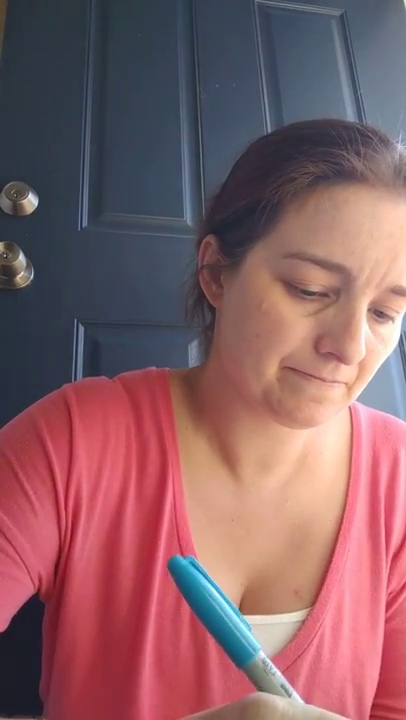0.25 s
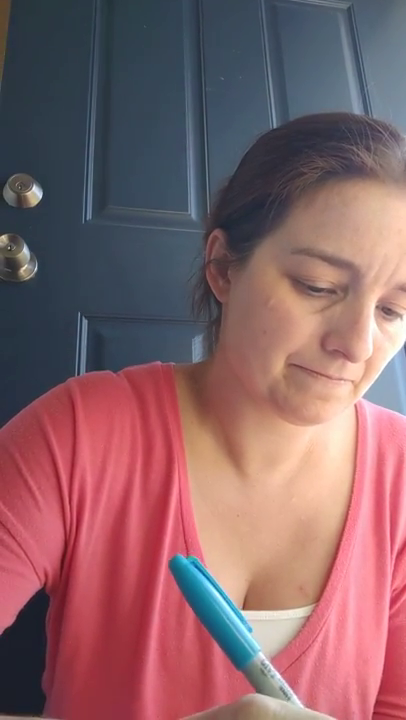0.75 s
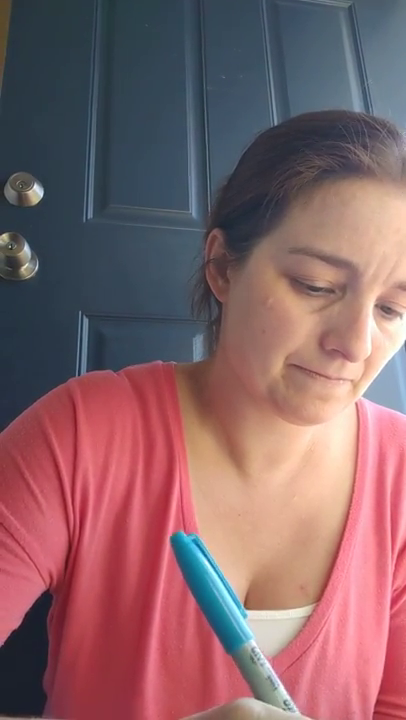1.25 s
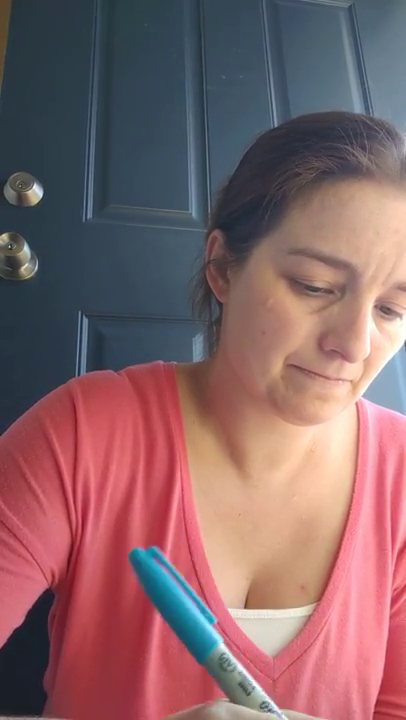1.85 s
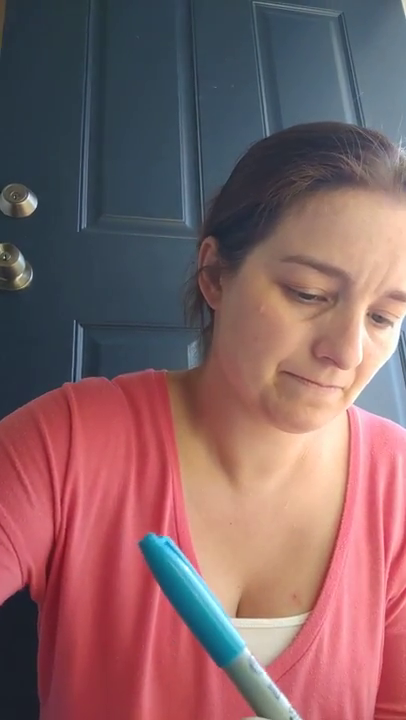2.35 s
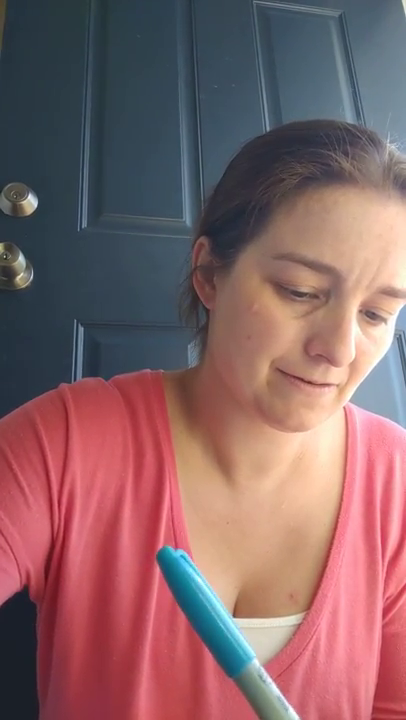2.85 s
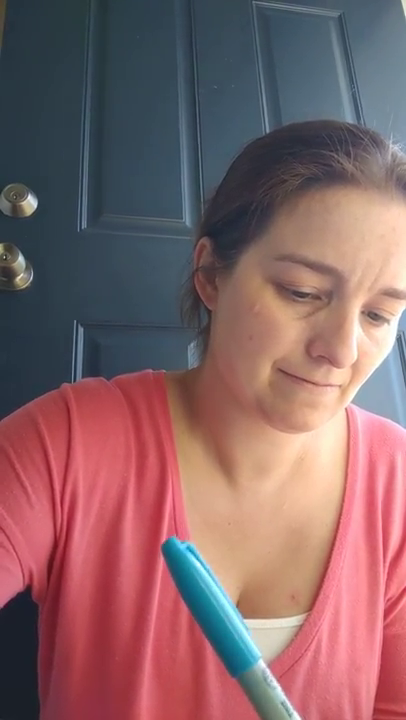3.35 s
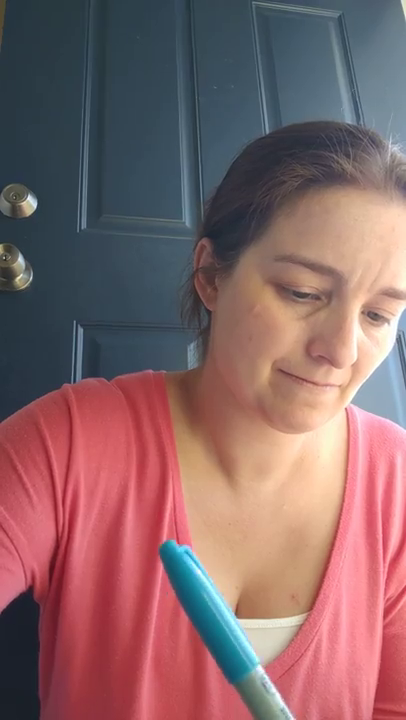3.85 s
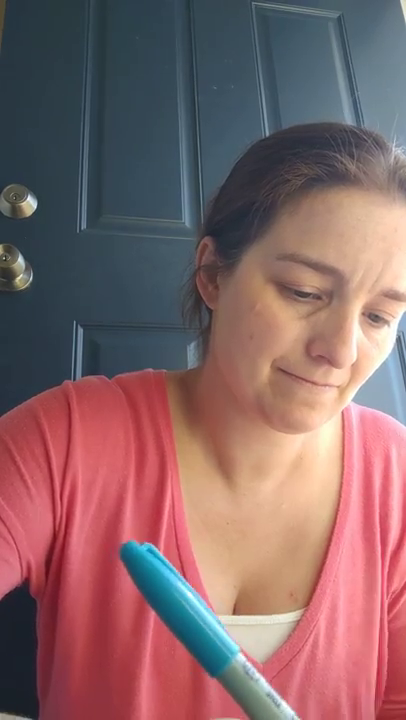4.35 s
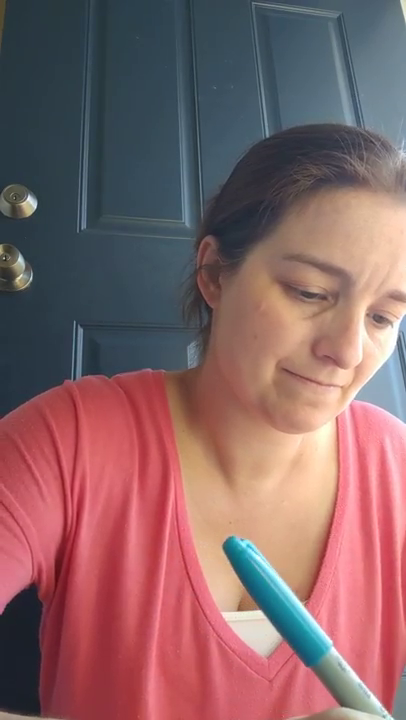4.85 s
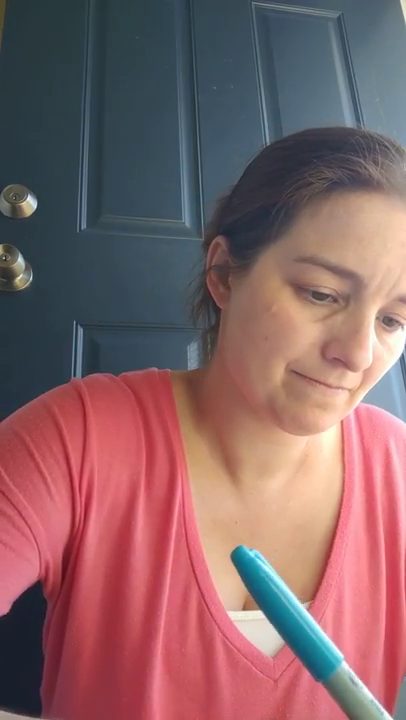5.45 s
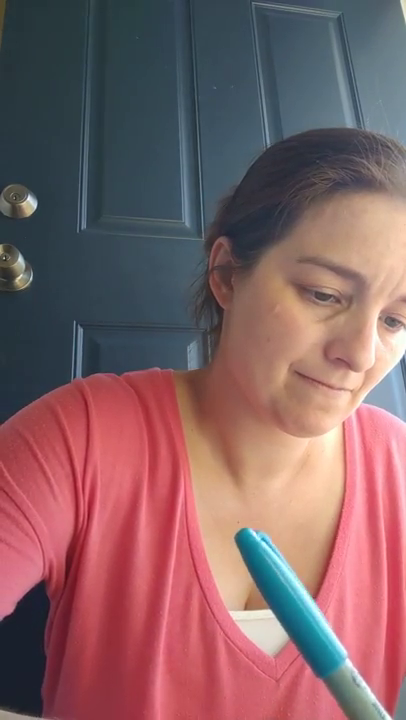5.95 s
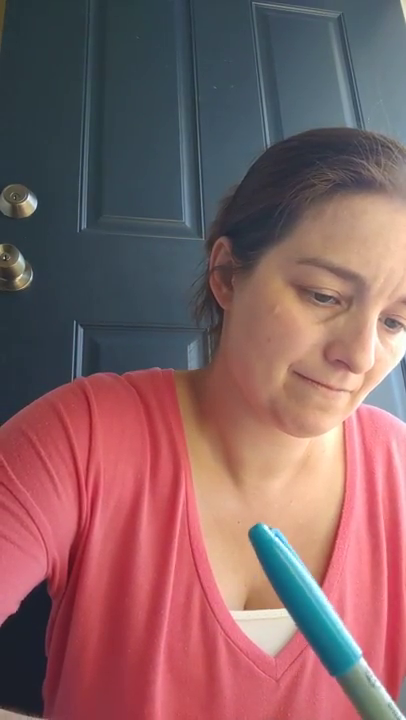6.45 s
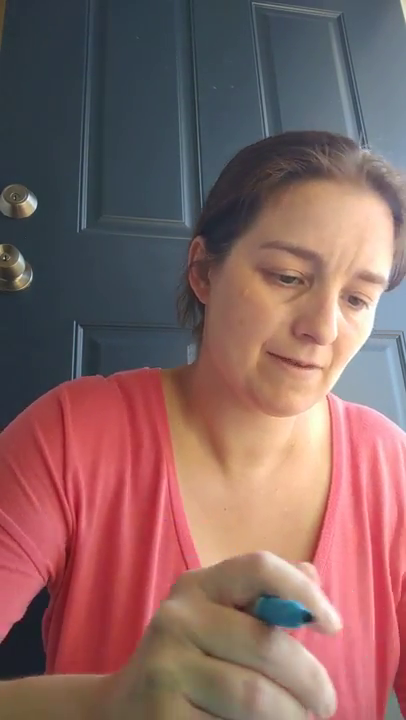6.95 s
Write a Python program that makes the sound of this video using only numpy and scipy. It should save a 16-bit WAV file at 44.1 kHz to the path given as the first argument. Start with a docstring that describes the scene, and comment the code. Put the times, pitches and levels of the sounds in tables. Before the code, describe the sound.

A felt-tip marker writes on paper lying on a table, close to the microphone in a quiet room. Short, faint rasping strokes come several per second, with thin squeaks and tiny clicks. Just after two seconds a hard knock rings the table, followed by smaller taps; writing resumes until about six and a half seconds, then fades into light clicks.

```python
"""At a table in a quiet room, a felt-tip marker writes on a sheet of paper close to the microphone.
Tiny random slips of the nib's fibres drive three filters: the sheet rasps, the fibres fizz, the nib sings.
Each stroke swells and fades with the pen's speed, over light clicks, soft bumps and a faint brush of skin.
Sharp blows ring the table top; the heel of the hand thumps it twice, and its low modes ring out as sines.
Underneath lie the dull rumble of the hand, faint air noise and a low, slowly sinking hum."""
import sys
import numpy as np
from scipy import signal
from scipy.fft import rfft, irfft
from scipy.io import wavfile
from scipy.ndimage import uniform_filter1d

SR = 44100
rng = np.random.default_rng(int(sys.argv[2]) if len(sys.argv) > 2 else 0)


def file_out(sig):
    """Save sig as 16-bit WAV at sys.argv[1]."""
    # one column per channel
    cols = np.atleast_2d(sig).T
    # limit, then scale
    lim = np.clip(cols, -1, 1)
    pcm = np.round(lim * 32767).astype(np.int16)
    wavfile.write(sys.argv[1], SR, pcm)


N = 317167  # length in samples

# All levels are settings ahead of the mix trims; spectra are relative, since each layer is scaled afterwards.
# pen strokes: start_s, length_s, fastest moment (share of length), rasp_db, fizz_db, song_db, nib pitch_hz
STROKES = [(0.33, 0.076, 0.25, -54, -61.5, -56.5, 3400), (0.428, 0.14, 0.048, -56.5, -60.0, -54.5, 3200),
           (0.684, 0.29, 0.24, -56.5, -64.5, -63, 3360), (0.824, 0.18, 0.34, -58.5, -62, -58, 3220),
           (1.036, 0.15, 0.8, -51.5, -61, -55, 3300), (1.179, 0.11, 0.18, -59, -60.5, -54.5, 3460),
           (1.299, 0.069, 0.47, -52, -60, -54.5, 3600), (1.364, 0.12, 0.63, -73.0, -76, -67.5, 3620),
           (1.528, 0.12, 0.58, -48.5, -58, -52, 3430), (1.677, 0.084, 0.058, -54.5, -56, -54, 3600),
           (1.731, 0.14, 1, -47.0, -56, -63, 3650), (1.994, 0.28, 0.24, -67.5, -62, -54, 3650),
           (2.26, 0.12, 0.31, -61.5, -66.5, -61, 3430), (2.727, 0.07, 0.28, -54, -58.5, -60.5, 3660),
           (2.817, 0.15, 0.41, -56.5, -57.5, -59, 3930), (3.078, 0.14, 0.27, -61.5, -58, -55.5, 3970),
           (3.196, 0.14, 0.2, -59.5, -60.5, -58.5, 4020), (3.338, 0.074, 0.31, -63, -68, -51, 3920),
           (3.401, 0.11, 0.61, -54, -59.5, -57.5, 3570), (3.499, 0.11, 0.3, -63.5, -62, -55.0, 4100),
           (3.631, 0.091, 0.079, -58.5, -64, -55.5, 3550), (3.731, 0.059, 0.94, -78, -73, -59.5, 4130),
           (3.889, 0.1, 0.44, -55.0, -61, -54, 3450), (4.012, 0.12, 0.072, -56.5, -55.5, -53, 3950),
           (4.09, 0.132, 0.93, -51, -56.0, -50.5, 3470), (4.313, 0.25, 0.21, -65.5, -67.0, -64.0, 3300),
           (4.469, 0.17, 0.36, -59.5, -63, -60, 3270), (4.608, 0.15, 0.25, -59, -62.5, -58, 3470),
           (4.717, 0.16, 0.61, -59.5, -61.5, -55.5, 3230), (4.924, 0.14, 0.8, -79, -79.5, -70.5, 3700),
           (5.164, 0.069, 0.75, -55.5, -62, -58, 3600), (5.261, 0.12, 0.039, -52, -58, -54.5, 3470),
           (5.481, 0.16, 0.5, -55.5, -61.5, -61.5, 3700), (5.614, 0.097, 0.09, -56, -60, -59.5, 3850),
           (5.727, 0.054, 0.85, -62.5, -59, -55.5, 4000), (5.771, 0.16, 0.42, -52, -59, -59, 3730),
           (5.879, 0.12, 0.39, -55.5, -58.5, -56.5, 3800), (6.012, 0.098, 0.091, -56.5, -62, -58.5, 3840),
           (6.086, 0.11, 0.64, -70, -67, -61.5, 3870), (6.201, 0.035, 0.28, -61.5, -64, -54.5, 3950),
           (6.271, 0.104, 0.36, -54.0, -58, -54.5, 3770), (6.402, 0.17, 0.074, -54.5, -56.5, -56, 3660),
           (6.505, 0.13, 0.79, -49, -54, -53, 3700), (6.908, 0.21, 0.7, -67, -69.5, -64.5, 3380),
           (7.11, 0.15, 0.073, -65, -74, -61, 3400)]
# the nib catches and sings out: start_s, length_s, level_db
SQUEAKS = [(0.45, 0.058, -52), (0.79, 0.052, -52.5), (1.04, 0.03, -54.5), (1.229, 0.041, -46.5),
           (1.78, 0.12, -49.5), (2.948, 0.03, -58.5), (3.149, 0.041, -51), (3.36, 0.045, -52),
           (3.559, 0.044, -47.5), (3.69, 0.025, -56.5)]
SQUEAK_PEAK = 0.26  # fastest moment of a squeak, as a share of its length
RASP_LAW, FIZZ_LAW, NIB_LAW = 0.6, 0.98, 0.76  # each layer's amplitude grows as pen speed to this power
RELEASE_S = 0.0077  # smoothing time of the power: the scratch lingers after the pen slows
# colour of the slips in the sheet: pitch_hz, gain_db
RASP_SPECTRUM = [(60, -6), (170, 0.5), (260, 5.5), (500, 1.5), (660, -3.5), (900, -3.5), (1200, -6.5),
                 (2000, -3), (2700, -6.5), (3500, -21.5), (4300, -25), (7000, -48)]
# colour of the slips in the fibres: pitch_hz, gain_db
FIZZ_SPECTRUM = [(2000, -44), (4200, -12), (5500, 0.5), (6200, -2), (7100, 5.5), (8300, -3), (9300, -0.5),
                 (10500, -1), (11500, -0.5), (13000, 1), (15500, -3.5), (16500, -13)]
# colour of the slips in the nib: pitch_hz, gain_db
NIB_SPECTRUM = [(1000, -56), (2200, -7), (3000, -6.5), (3500, 2), (4000, 1), (4400, 1.5), (4900, -3),
                (5600, -8.5), (8000, -8.5), (14000, -28)]
# resonances and dips of the sheet lying on the table: pitch_hz, width_hz, lift_db
SHEET_MODES = [(554, 89, 8.5), (699, 75, -7), (804.5, 132, 14), (1009, 20, 14.5), (1195, 33, -5.5),
               (1415, 210, 5), (1640, 96, 4.5), (1720, 45, -9.5), (2395, 410, 4), (2990, 100, 10.5),
               (3200, 75, 9), (3400, 180, 18.5)]
# the side of the hand brushes faintly over the paper: start_s, length_s, rasp_db, fizz_db
BRUSHES = [(0, 0.35, -68.5, -99), (1.877, 0.34, -68, -76.5), (2.336, 0.44, -82, -81.5),
           (6.615, 0.12, -67.5, -94)]
BRUSH_PEAK, BRUSH_LAW = 0.067, 0.28  # fastest moment (share of length); power of speed
# light clicks of the nib, the barrel and the paper: start_s, peak_db, pitch_hz, t60_s
TICKS = [(0.013, -36.5, 990, 0.056), (.269, -43.5, 2800, 0.089), (.269, -56, 9500, 0.044),
         (.344, -38.5, 2730, 0.043), (.697, -38.5, 1070, 0.034), (.793, -41, 9100, 0.0095),
         (1.309, -40, 1800, 0.054), (1.512, -48, 2520, 0.0083), (1.518, -45, 600, 0.054),
         (1.682, -38.5, 1480, 0.085), (2.168, -29, 2200, 0.027), (2.212, -43, 8800, 0.016),
         (2.667, -42, 3420, 0.032), (3.344, -43, 3650, .04), (3.849, -46.5, 3840, .03),
         (4.022, -42, 4500, 0.047), (6.284, -41, 3640, .04), (6.41, -38, 2390, 0.057),
         (6.864, -46.5, 2540, 0.023), (7.002, -47.5, 1840, 0.058), (7.044, -39, 11400, 0.019),
         (7.082, -42.5, 3260, 0.11), (7.128, -36.5, 2930, 0.047)]
TICK_RISE_S = 0.0004  # a click swells this quickly
# sharp blows on the table: start_s, peak_db, treble_db (7 dB is added to it for the treble tilt)
KNOCKS = [(.0135, -43.5, -23), (0.495, -45, -53), (.696, -38.5, -14), (1.1158, -29.5, -49),
          (2.1526, -10, -4), (2.17, -28, 0), (2.227, -32, -41), (2.326, -21.5, -10), (2.401, -37.5, -34),
          (3.238, -37, -24), (4.329, -25, -11.5), (5.718, -38, -14.5), (6.426, -26.5, -7.5)]
# colour of a blow on the table top: pitch_hz, gain_db
KNOCK_SPECTRUM = [(25, -28), (65, -5), (130, -8), (220, -25.5), (290, -10), (680, -10), (840, -18.5),
                  (1070, -14.5), (1600, -10.5), (2300, -24.5), (2750, -18), (3600, -16.5), (5400, -36.5),
                  (12000, -59.5)]
# modes of the table top: pitch_hz, width_hz, lift_db
TABLE_MODES = [(66.3, 6.8, -0.5), (94, 24, -1.5), (197, 17, 9), (264.6, 61, 15.5), (363, 23, 6),
               (504, 70, 7.5), (736, 117, 14.5), (1061, 130, 10.5), (1440, 150, 0.5), (2400, 150, 5),
               (3000, 140, 3.5), (3315, 120, -14), (3460, 76, 9), (4690, 480, 5)]
# the heel of the hand thumps the table: start_s, peak_db
THUMPS = [(2.173, -30), (2.351, -42)]
# low modes of the table that a thump rings: pitch_hz, level_db, t60_s
THUMP_MODES = [(69.9, -5.5, 1), (97.3, 3, 0.31), (187.4, -0.5, .3), (248, -9, 0.25)]
THUMP_RISE_S = 0.0032  # a thump builds up over this time
# soft bumps of the hand and the nib pressing down: start_s, level_db, pitch_hz, length_s (swell peaks at 1/4)
BUMPS = [(0.103, -57, 227, 0.038), (.278, -46.5, 313, 0.052), (.496, -49.5, 300, 0.027),
         (0.69, -51.5, 210, 0.033), (0.892, -52, 365, .05), (1.074, -50.5, 84, 0.1),
         (1.12, -45, 380, 0.035), (1.305, -52.5, 160, 0.028), (1.516, -46.5, 352, 0.06),
         (1.543, -43, 220, 0.053), (1.683, -51, 70.6, 0.079), (1.916, -51.5, 308, 0.04),
         (2.175, -44, 281, 0.037), (2.243, -51, 200, 0.057), (2.682, -49.5, 283, 0.025),
         (2.832, -53, 288, 0.029), (3.096, -54.5, 280, 0.027), (3.244, -52.5, 282, .031),
         (3.856, -53, 187, 0.029), (6.614, -41.5, 600, 0.043)]
# rumble of the hand shifting on the table: time_s, level_db
HAND_LEVEL = [(0, -71), (.5, -65), (1.2, -68.5), (1.8, -47.5), (2.1, -75), (2.6, -58), (3.1, -70.5),
              (5.6, -65.5), (7.19, -77)]
# colour of that rumble: pitch_hz, gain_db
HAND_SPECTRUM = [(25, -11), (45, -15), (65, 22.5), (100, -26), (140, -4), (270, -2.5), (450, -5),
                 (900, -46), (3000, -41)]
# colour of the quiet room's air: pitch_hz, gain_db
AIR_SPECTRUM = [(20, -12), (45, 2), (80, 2), (160, -10.5), (250, -12.5), (380, -24), (520, -19), (800, -20),
                (1700, -32), (2400, -26), (3600, -25), (5200, -35), (12000, -42.5), (16000, -45.5)]
AIR_DB = -60  # middle level, around which the air drifts
# lines of the room's low hum: pitch_hz, level_db
HUM_LINES = [(63, 3), (97, -28.5), (124, -7.5)]
HUM_DB, HUM_FADE_DB_PER_S = -54.5, 1.54  # hum level at the start around which it drifts; how fast it sinks
EDGE_HZ = 16000  # top of the sound's band


def writing():
    """One stream of slips drives sheet, fibres and nib; the grip flutters with the grain of the paper."""
    start, length, fastest, rasp_db, fizz_db, nib_db, nib_hz = np.transpose(STROKES)
    drive = slips(per_s=4000, spread_db=-0.5, smooth=0.58)
    drive = drive * gain_of(1.2 * wander(hz=108.2))
    # ever new fibres meet the paper, each bundle with its own colour
    drive = patchy(drive, depth_db=2.6, span_s=0.05, span_hz=520)
    # the hand and the things on the table throw the scratch back and comb it
    drive = drive + gain_of(-10) * echoes(drive, t60=0.03, first_s=0.001)

    # the sheet answers the uneven pressure of the hand
    pressure = gain_of(0.4 * wander(hz=22))
    rasp_level = loudness(zip(start, length, fastest, rasp_db), RASP_LAW)
    rasp = coloured(drive, RASP_SPECTRUM, SHEET_MODES) * pressure * rasp_level
    fizz_level = loudness(zip(start, length, fastest, fizz_db), FIZZ_LAW)
    fizz = coloured(drive, FIZZ_SPECTRUM) * fizz_level

    # the nib's resonance glides from one stroke's pitch to the next as the pen turns
    pitch_hz = np.interp(np.arange(N) / SR, start + length / 2, nib_hz)
    ring = resonate(drive, pitch_hz, width=1320)
    steady = loudness(zip(start, length, fastest, nib_db), NIB_LAW)
    squeaks = loudness([(s, length_s, SQUEAK_PEAK, db) for s, length_s, db in SQUEAKS], NIB_LAW)
    song = coloured(ring, NIB_SPECTRUM) * np.hypot(steady, squeaks)
    return gain_of(0.44) * rasp + gain_of(-0.82) * fizz + gain_of(-1.45) * song


def slips(per_s, spread_db, smooth):
    """Fibres letting go: random clicks of uneven size over a smooth rub."""
    size = gain_of(spread_db * np.minimum(rng.exponential(1, N), 4))
    size = size * rng.choice([-1, 1], N)
    clicks = evened(size * (rng.random(N) < per_s / SR))
    return clicks + smooth * rng.standard_normal(N)


def speed(length_s, fastest):
    """The pen speeds up from rest and slows again: two quarter sines that meet at the fastest moment."""
    u = np.linspace(0, 1, round(length_s * SR))
    fastest = np.clip(fastest, 0.03, 0.97)
    return np.sin(np.pi / 2 * np.minimum(u / fastest, (1 - u) / (1 - fastest)))


def loudness(moves, law):
    """Amplitude of a layer over time; rows hold start_s, length_s, fastest moment, level_db."""
    power = np.zeros(N)
    for s, length_s, fastest, db in moves:
        amplitude = gain_of(db) * speed(length_s, fastest) ** law
        add(power, s, amplitude ** 2)
    r = np.exp(-1 / (RELEASE_S * SR))
    return np.sqrt(signal.lfilter([1 - r], [1, -r], power + 1e-20))


def brushing():
    """Skin slides over the sheet: a smooth, faint rub."""
    rasp_level = loudness([(s, length_s, BRUSH_PEAK, db) for s, length_s, db, _ in BRUSHES], BRUSH_LAW)
    fizz_level = loudness([(s, length_s, BRUSH_PEAK, db) for s, length_s, _, db in BRUSHES], BRUSH_LAW)
    rub = rng.standard_normal(N)
    rasp = rasp_level * coloured(rub, RASP_SPECTRUM, SHEET_MODES)
    return rasp + fizz_level * coloured(rub, FIZZ_SPECTRUM)


def ticks(octaves=0.63):
    """Brief rattling clicks: decaying noise, each around its own pitch."""
    out = np.zeros(N)
    for s, peak_db, hz, t60 in TICKS:
        click = burst(hz, octaves)
        t = np.arange(len(click)) / SR
        click = click * (1 - np.exp(-t / TICK_RISE_S)) * gain_of(-60 * t / t60)
        add(out, s, gain_of(peak_db) * click / abs(click).max())
    return out


def knocks():
    """Pen and hand strike the table; the treble of each blow scatters off things close by."""
    out = np.zeros(N)
    for s, peak_db, treble_db in KNOCKS:
        add(out, s, blow(peak_db, treble_db))
    treble = signal.sosfilt(signal.butter(2, 2200, "high", fs=SR, output="sos"), out)
    return out + gain_of(-5.5) * echoes(treble, t60=0.026, first_s=0.001)


def blow(peak_db, treble_db, flight_s=0.000597, lag_cycles=1.599):
    """The table rings briefly; a hard blow reaches the treble, and slow bending waves bring the bass later."""
    hz = np.fft.rfftfreq(16384, 1 / SR)
    # the treble tilt starts at 500 Hz
    tilt = np.clip(np.log((hz + 1) / 500) / np.log(5), 0, 1.5)
    hardness_db = (treble_db + 7) * tilt
    log_gain = np.log(gain_of(shape_db(hz, KNOCK_SPECTRUM, TABLE_MODES) + hardness_db))
    # minimum phase: the ring starts at once and dies away
    mirrored = np.r_[log_gain, log_gain[-2:0:-1]]
    causal = np.conj(signal.hilbert(mirrored))[:len(hz)]
    delay_s = flight_s + lag_cycles / (hz + 20)
    ring = irfft(np.exp(causal - 2j * np.pi * np.cumsum(delay_s) * hz[1]))
    return gain_of(peak_db) * ring / abs(ring).max()


def thumps():
    """The heel of the hand lands, and the table's low modes ring out as decaying sines."""
    t, out = np.arange(SR) / SR, np.zeros(N)
    ring = sum(gain_of(db - 60 * t / t60) * np.sin(2 * np.pi * hz * t) for hz, db, t60 in THUMP_MODES)
    ring = ring * (1 - np.exp(-t / THUMP_RISE_S))
    for s, peak_db in THUMPS:
        add(out, s, gain_of(peak_db) * ring / abs(ring).max())
    return out


def bumps(octaves=0.68):
    """Soft, rounded bumps: the push swells quickly and eases off."""
    out = np.zeros(N)
    for s, db, hz, length_s in BUMPS:
        bump = burst(hz, octaves, TABLE_MODES)
        u = np.arange(len(bump)) / SR / (length_s / 4)
        swell = u * np.exp(1 - u)
        add(out, s, gain_of(db) * evened(bump * swell) * np.sqrt(np.mean(swell ** 2)))
    return out


def hand():
    """Dull rumble of the hand shifting on the table: noise through the table's modes."""
    level_db = np.interp(np.arange(N) / SR, *np.transpose(HAND_LEVEL))
    rumble = coloured(rng.standard_normal(N), HAND_SPECTRUM, TABLE_MODES)
    return rumble * gain_of(level_db + 1.8 * wander(hz=11))


def room_tone():
    """Faint, uneven air noise and a low hum of sines that wavers, swells and slowly fades."""
    t = np.arange(N) / SR
    hum = np.zeros(N)
    for hz, db in HUM_LINES:
        swell = gain_of(db + 0.53 * wander(hz=1.5))
        hum += swell * np.sin(2 * np.pi * hz * t + 2.1 * wander(hz=1.9))
    hum_db = HUM_DB - HUM_FADE_DB_PER_S * t + 0.8 * wander(hz=0.5)
    air = coloured(rng.standard_normal(N), AIR_SPECTRUM) * gain_of(AIR_DB + 1.1 * wander(hz=4.6))
    return air + gain_of(hum_db) * evened(hum)


def echoes(x, t60, first_s):
    """Sparse reflections of random sign that die away; energy 1."""
    t = np.arange(SR // 2) / SR
    taps = rng.standard_normal(len(t)) * gain_of(-60 * t / t60)
    hits = (rng.random(len(t)) < 3000 / SR) * (t > first_s)  # 3000 reflections a second on average
    taps = taps * hits
    return signal.fftconvolve(x, taps / np.linalg.norm(taps))[:N]


def burst(hz, octaves, resonances=()):
    """A third of a second of noise in a band around hz; rms 1."""
    f = np.fft.rfftfreq(16384, 1 / SR) + 1
    band = 1 / (1 + (np.log2(f / hz) / octaves) ** 4)
    phase = np.exp(2j * np.pi * rng.random(len(f)))
    return evened(irfft(band * gain_of(lift_db(f, resonances)) * phase))


def resonate(x, hz, width):
    """A resonance of gain 1 that follows the curve hz: shift down, smooth, shift back up."""
    turn = np.exp(2j * np.pi * np.cumsum(hz) / SR)
    r = np.exp(-np.pi * width / SR)
    return 2 * (turn * signal.lfilter([1 - r], [1, -r], x / turn)).real


def patchy(x, depth_db, span_s, span_hz):
    """Lets the colour of a sound drift in random patches of time and frequency."""
    hz, t, z = signal.stft(x, SR, nperseg=256)
    field = rng.standard_normal(z.shape)
    for axis, size in enumerate([span_hz / hz[1], span_s / t[1]]):
        field = uniform_filter1d(field, max(round(size), 1), axis)
    return signal.istft(z * gain_of(depth_db * evened(field)), SR)[1][:N]


def coloured(x, spectrum, resonances=()):
    """Filters by a spectrum and its resonances; rms 1."""
    gain = gain_of(shape_db(np.fft.rfftfreq(N, 1 / SR), spectrum, resonances))
    return evened(irfft(rfft(x) * gain, N))


def shape_db(hz, spectrum, resonances):
    """A smooth spectrum with its resonances, in dB."""
    return read(spectrum, hz) + lift_db(hz, resonances)


def lift_db(hz, resonances):
    """Resonant bumps and dips, in dB."""
    return sum(lift / (1 + (2 * (hz - f) / width) ** 2) for f, width, lift in resonances)


def read(points, hz):
    """A spectrum joined by straight lines on a log-frequency axis."""
    f, value = np.transpose(points)
    return np.interp(np.log(hz + 1), np.log(f + 1), value)


def wander(hz):
    """Smooth chance up to about the given rate; rms 1."""
    f = np.fft.rfftfreq(N, 1 / SR)
    return evened(irfft(rfft(rng.standard_normal(N)) * np.exp(-(f / hz) ** 2), N))


def gain_of(db):
    """Decibels to amplitude."""
    return 10 ** (np.asarray(db) / 20)


def evened(x):
    """Scales to rms 1."""
    return x / np.sqrt(np.mean(x ** 2) + 1e-20)


def add(mix, s, sound):
    """Mixes a sound in at time s."""
    part = mix[max(round(s * SR), 0):][:len(sound)]
    part += sound[:len(part)]


def scene():
    """All the sounds of the table, with a little of the room."""
    paper = gain_of(0.5) * writing() + brushing() + gain_of(-4.5) * ticks()
    table = gain_of(-3.0) * knocks() + thumps() + bumps() + gain_of(-6) * hand()
    near = paper + table
    room = gain_of(-20.0) * echoes(near, t60=0.18, first_s=0.0055)
    return (near + room + room_tone())[None]


def record(dry):
    """The microphone drops the deepest bass; then a steep low-pass limits the band."""
    thinned = signal.sosfilt(signal.butter(5, 35, "high", fs=SR, output="sos"), dry)
    low_pass = signal.firwin(511, EDGE_HZ, window=("kaiser", 9), fs=SR)
    return signal.oaconvolve(thinned, low_pass[None], "same")


dry = scene()
out = record(dry)
file_out(out)
```